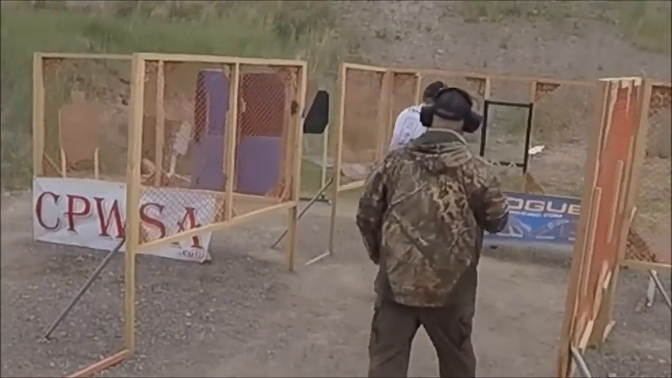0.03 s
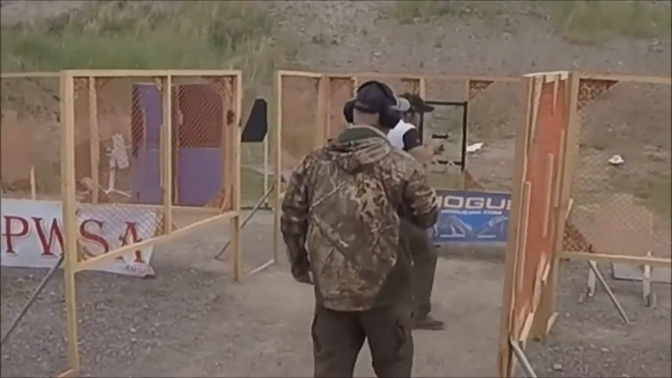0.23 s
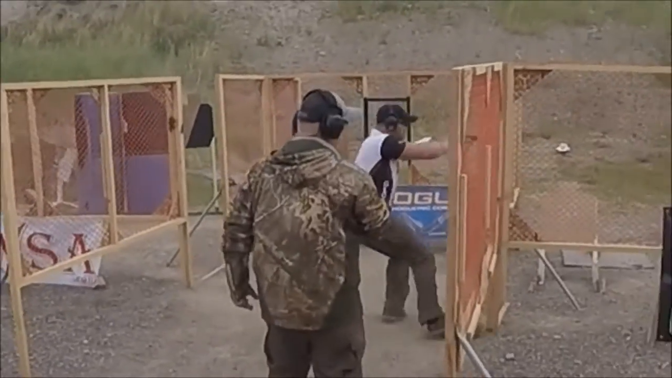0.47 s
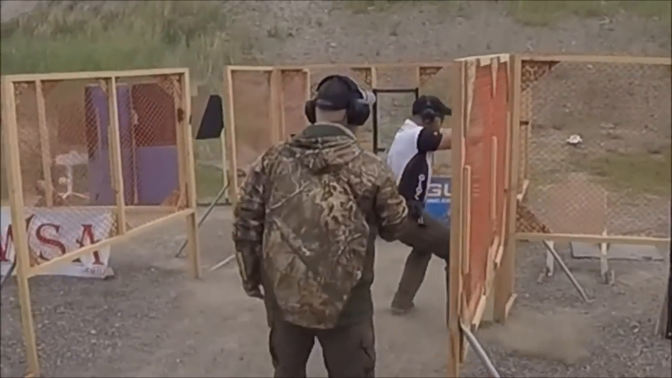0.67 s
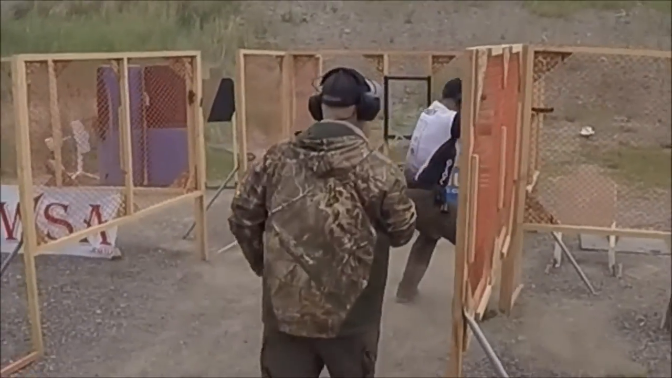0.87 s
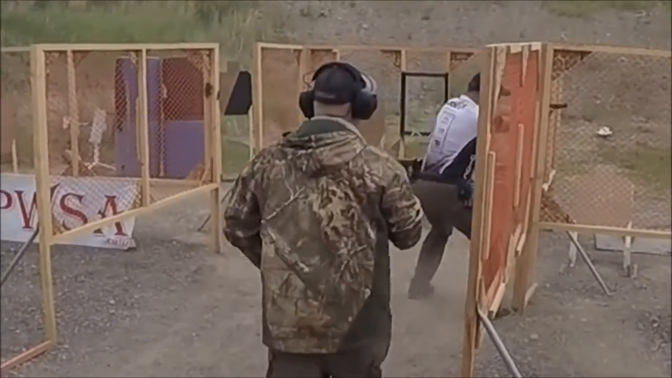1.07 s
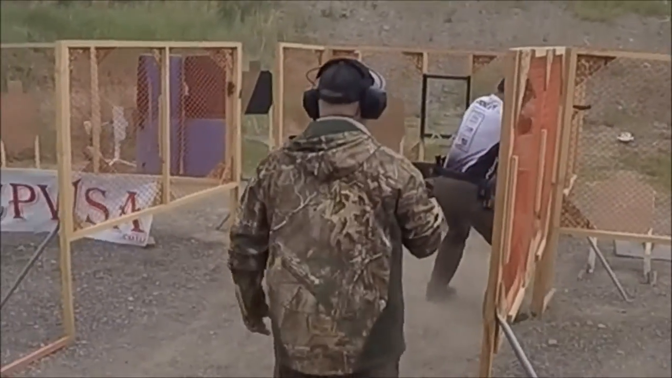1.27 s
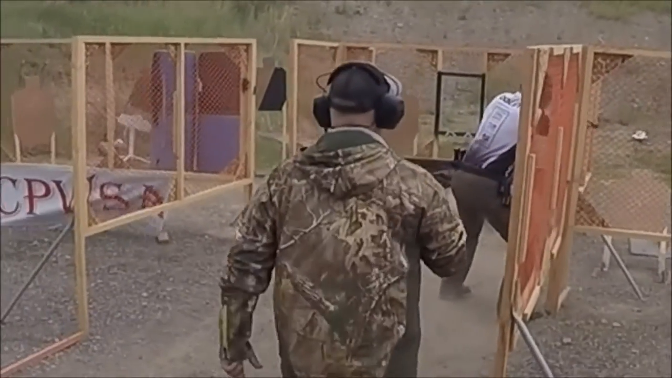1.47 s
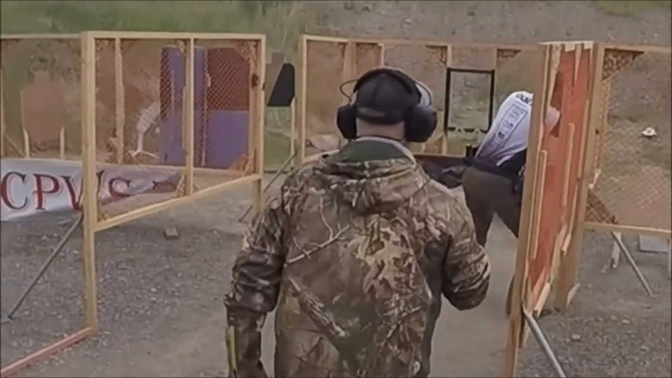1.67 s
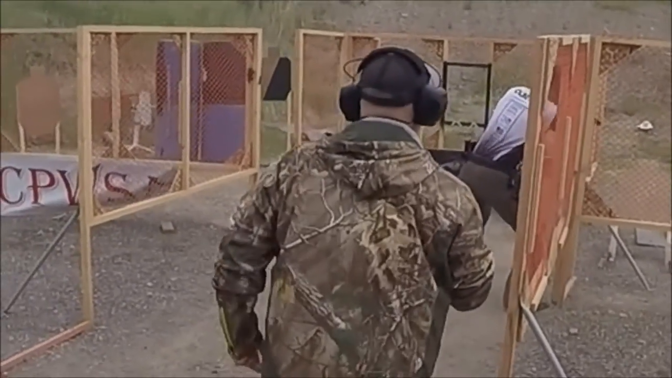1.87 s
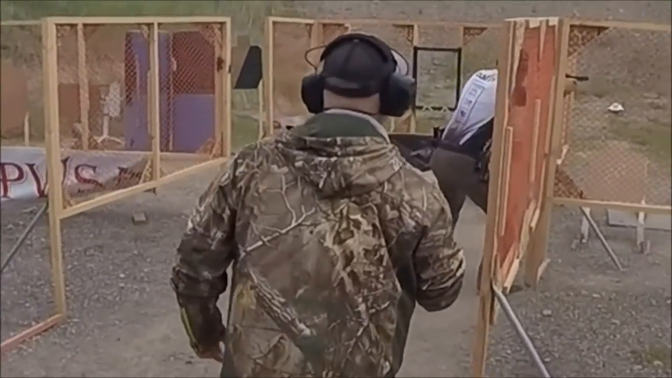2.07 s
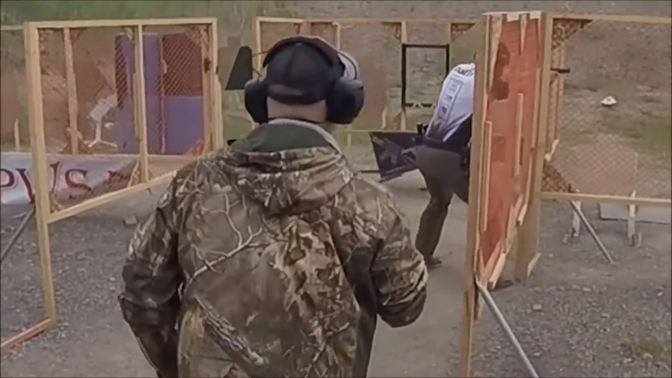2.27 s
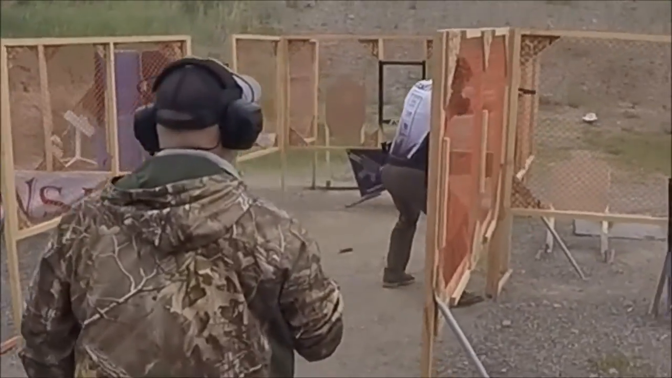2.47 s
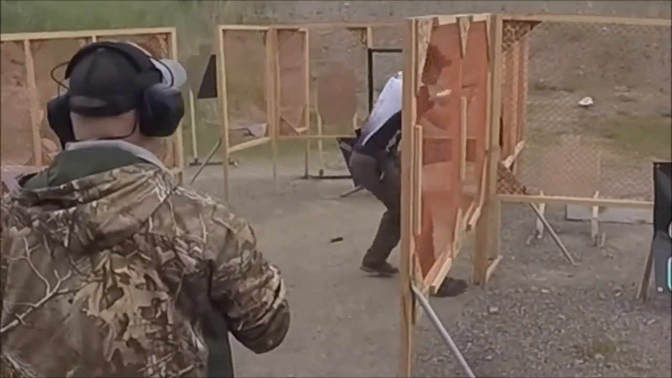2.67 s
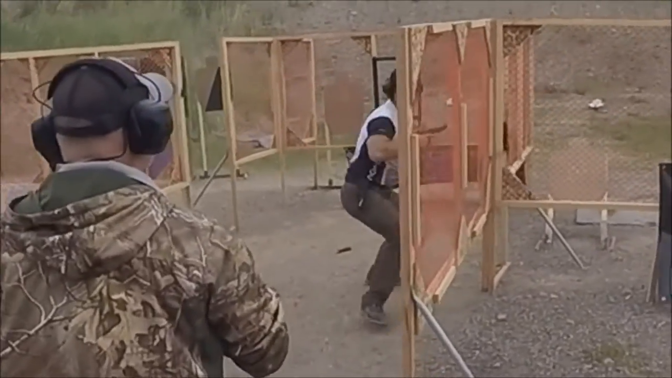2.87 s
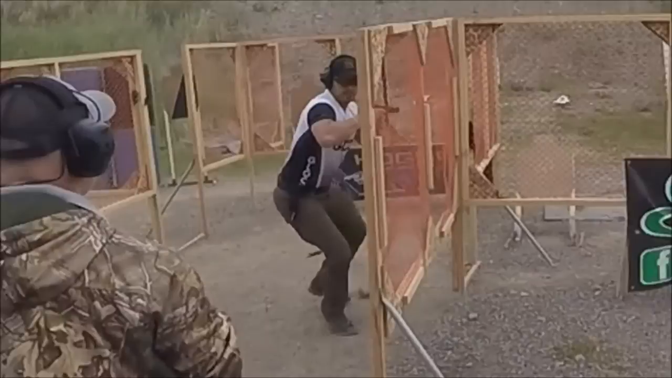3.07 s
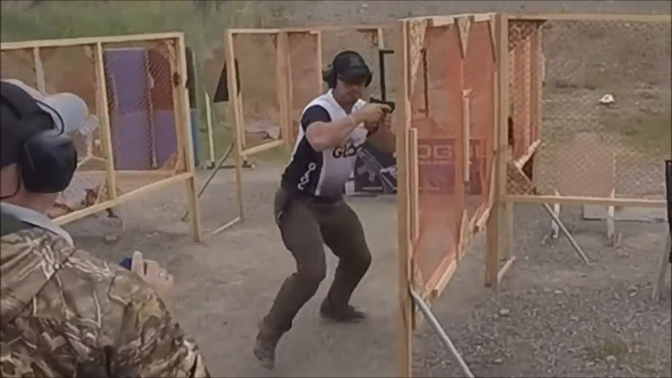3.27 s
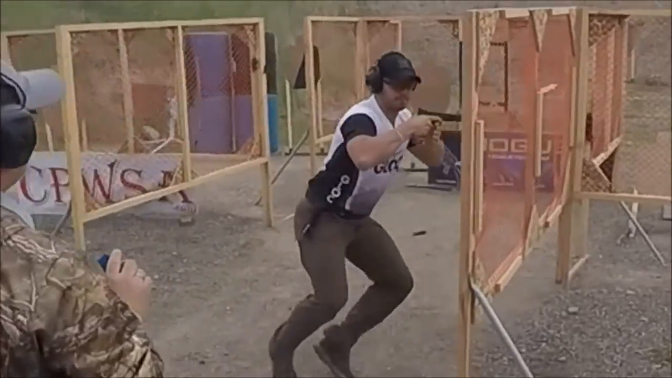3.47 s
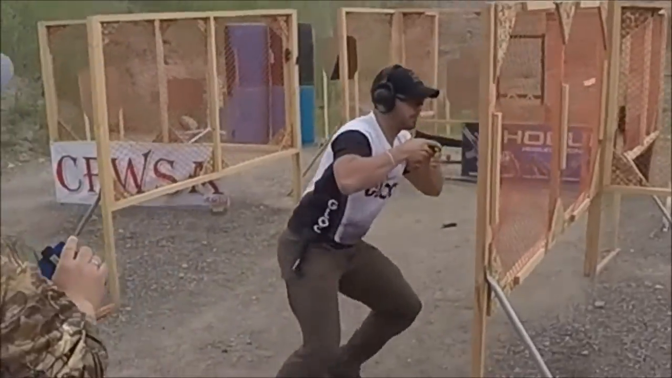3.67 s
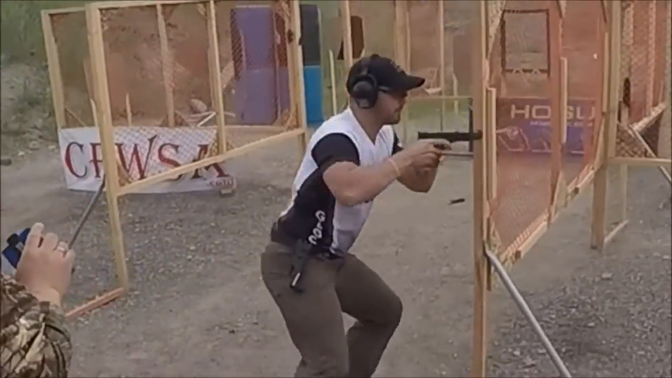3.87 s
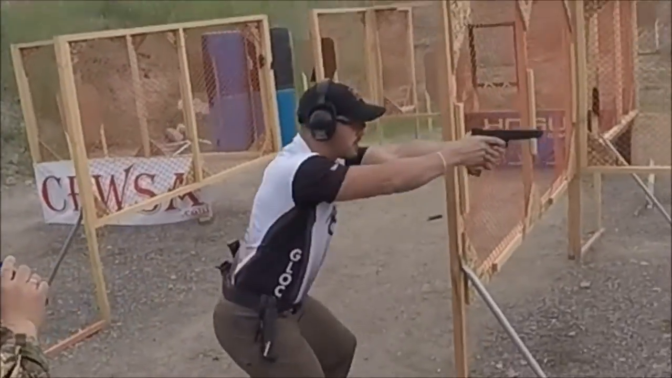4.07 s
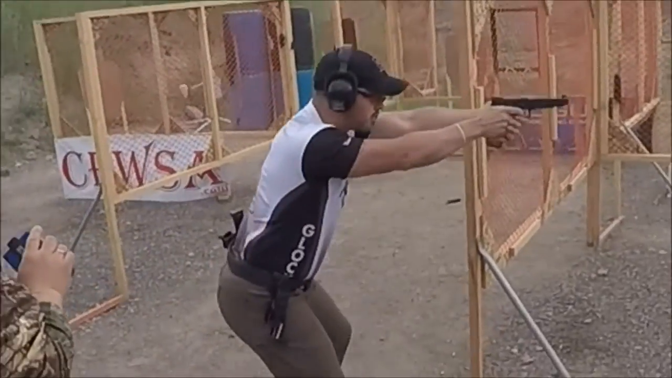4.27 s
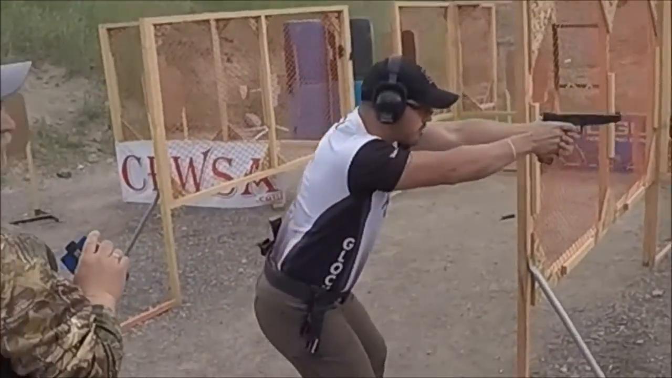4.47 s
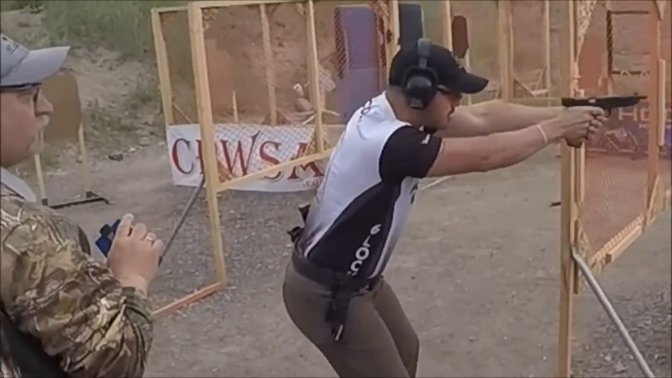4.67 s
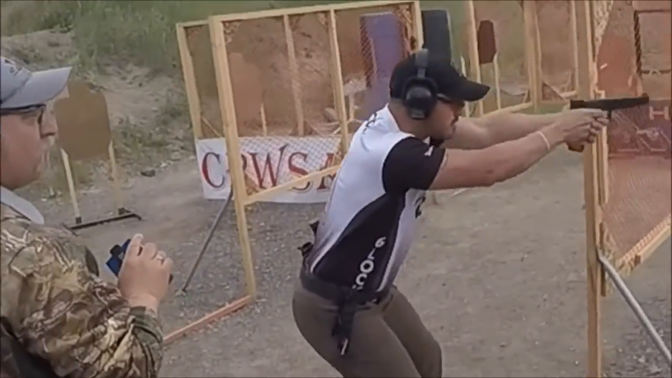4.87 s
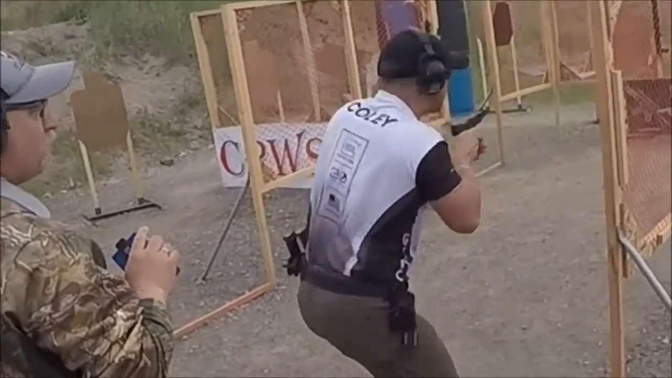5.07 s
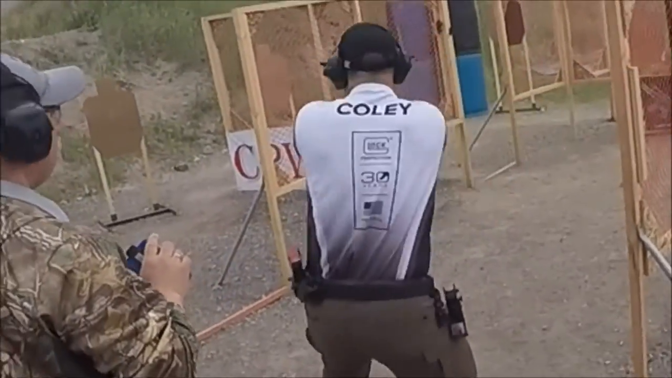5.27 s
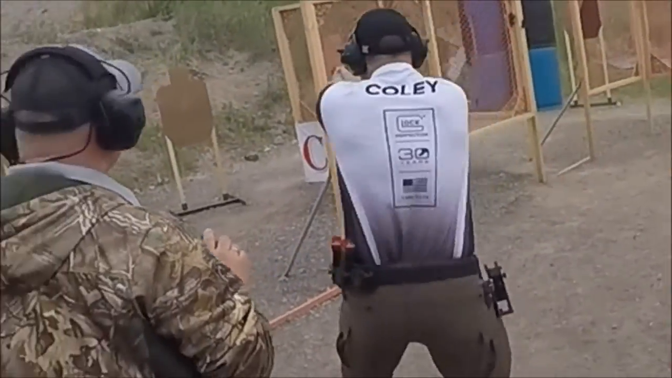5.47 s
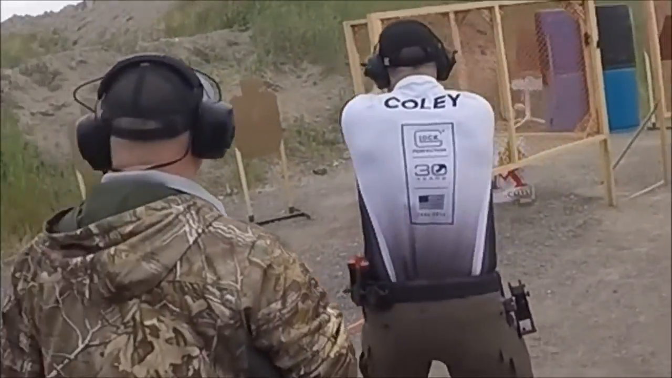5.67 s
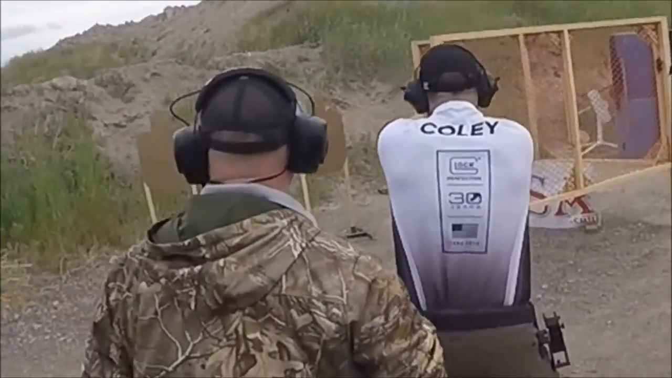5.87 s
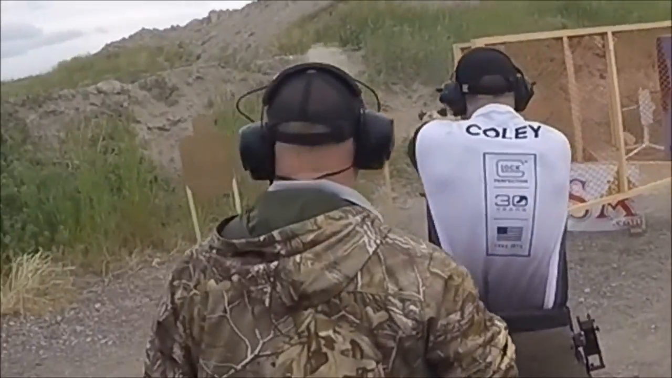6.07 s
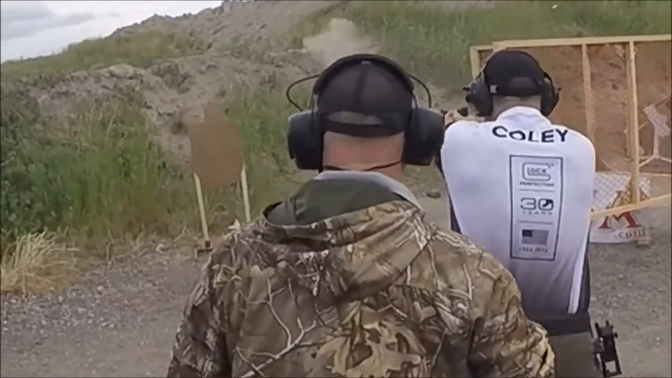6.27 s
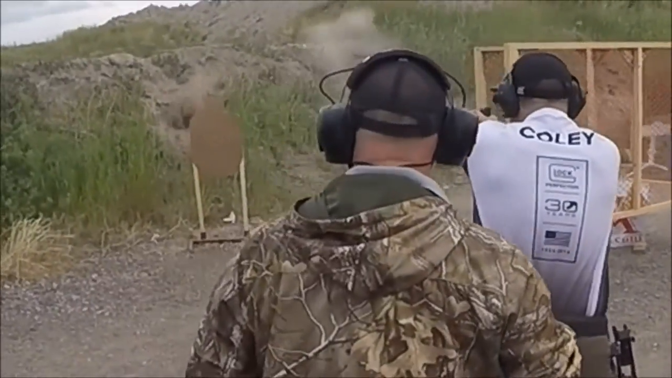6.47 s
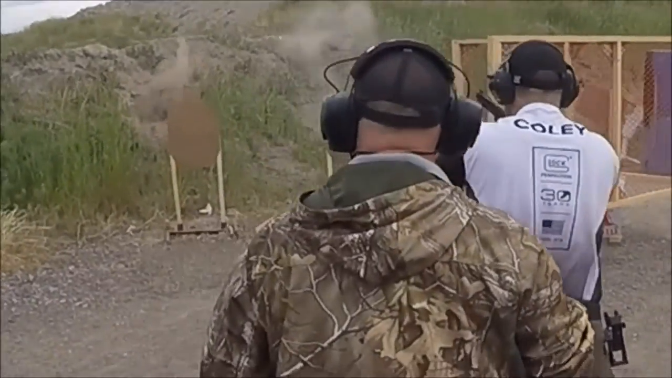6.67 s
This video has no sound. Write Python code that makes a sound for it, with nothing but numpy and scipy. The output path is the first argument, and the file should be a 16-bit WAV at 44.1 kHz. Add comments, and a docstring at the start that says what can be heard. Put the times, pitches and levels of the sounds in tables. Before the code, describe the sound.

Close pistol fire outdoors: seven echoing shots, a windy pause with gravel scuffs, then two quick strings of four.

```python
"""A gravel bay on an outdoor range, the microphone near a pistol competitor. Wind buffets it, boots
scuff the stones and spent cases tinkle. From 0.7 s come seven shots: each muzzle blast overloads the
microphone, bounces off ground and plywood walls and rolls away along the earth banks. In the lull
a faint whine falls far off, the boots move on and the strongest gust hits at about 4 s.
Two strings of four shots follow, at 4.3 s and 5.7 s, each with the echoes of a new position."""
import sys
import numpy as np
from scipy import signal
from scipy.fft import rfft, irfft
from scipy.io import wavfile

SR = 44100
rng = np.random.default_rng(int(sys.argv[2]) if len(sys.argv) > 2 else 0)


def store_wav(level_fs):
    """Save 16-bit WAV to argv[1]."""
    pcm = np.round(np.clip(np.atleast_2d(level_fs), -1, 1) * 32767)
    wavfile.write(sys.argv[1], SR, pcm.T.astype(np.int16))


N = 297230
TIME = np.arange(N) / SR
AGE = TIME[:SR]   # the second after an event


def from_db(db):
    return 10 ** (np.asarray(db) / 20)


def fade(t60):
    """Exponential decay, 60 dB down after t60 seconds."""
    return np.exp(-np.log(1000) * AGE / t60)


def swell(rise_s):
    """Smooth rise from nothing to one."""
    return 1 - np.exp(-(AGE / rise_s) ** 2)


def hiss():
    """One second of white noise."""
    return rng.standard_normal(SR)


def grains(spread_db):
    """One second of noise whose tiny impacts differ widely in size; rms 1."""
    x = hiss() * from_db(spread_db * np.clip(hiss(), -2.5, 2.5))
    return x / x.std()


def drift(rate_hz):
    """Slow random wander of spread 1."""
    step, settle = 40, 2000
    pole = np.exp(-2 * np.pi * step * rate_hz / SR)
    noise = rng.standard_normal(N // step + settle + 2)
    slow = signal.lfilter([1], [1, -2 * pole, pole * pole], noise)[settle:]
    return np.interp(np.arange(N) / step, np.arange(len(slow)), slow / slow.std())


def add(track, s, sound):
    """Mix a sound into a track at time s."""
    start = max(int(round(s * SR)), 0)
    track[start:start + len(sound)] += sound[:N - start]


def lowpass(x, hz):
    return signal.sosfilt(signal.butter(2, hz, fs=SR, output="sos"), x + 1e-18)


def colour(x, spectrum):
    """Causal (minimum-phase) filter with the given spectrum; white noise keeps its level."""
    size = 4096
    hz, db = np.transpose(spectrum)
    bin_hz = np.arange(size // 2 + 1) * SR / size
    gain = from_db(np.interp(np.log(bin_hz + 1), np.log(hz), db))
    cepstrum = irfft(np.log(gain))
    cepstrum[1:size // 2] *= 2
    cepstrum[size // 2 + 1:] = 0
    response = irfft(np.exp(rfft(cepstrum)))
    return signal.fftconvolve(x, response / np.linalg.norm(response))[:N]


def gust(rise_s, hold_s, fall_db_per_s):
    """Envelope of one gust: it builds, holds and dies away."""
    return np.minimum(TIME / rise_s, 1) * from_db(-fall_db_per_s * np.maximum(TIME - rise_s - hold_s, 0))


# Spectra of wind rumble, wind flutter and the open air of the bay: (frequency [Hz], relative level [dB])
RUMBLE_SPECTRUM = [(20, 4), (40, 3.5), (70, 1.5), (130, -6.5), (200, -16), (300, -22), (600, -67)]
FLUTTER_SPECTRUM = [(94, -19.5), (160, 0), (332, -6.5), (371, -5), (530, -8.5), (912, -9.5), (1480, -33),
                    (2040, -32), (7690, -60), (8940, -77.5), (11800, -72), (14000, -68.5)]
AIR_SPECTRUM = [(30, 5), (100, -13.5), (200, -20.5), (450, -30), (850, -14.5), (1100, -18), (1400, -30.5),
                (2400, -36.5), (3500, -44), (5000, -41.5), (8000, -48), (15000, -58)]
# Gusts on the microphone: (time [s], rise [s], hold [s], rumble level [dB], flutter level [dB])
GUSTS = [(0, 0.0077, 0.56, -29.5, -48), (0.417, 0.082, 0.095, -26, -40.5), (2.032, 0.086, 0.78, -31, -51.5),
         (2.249, .08, 0.22, -28, -43.5), (2.945, 0.088, 0.66, -42, -55), (3.584, 0.11, .15, -25, -40),
         (3.778, 0.05, 0.19, -17, -26), (3.969, 0.17, .11, -11.5, -16), (4.967, 0.088, 0.14, -41, -57),
         (5.193, 0.076, 0.37, -31, -44), (6.038, 0.037, 0.082, -44, -72)]


def wind():
    """Gusts rumble on the microphone port; strong ones break into flutter. Faint open air lies below."""
    rumble_power = np.full(N, from_db(-59) ** 2)   # the breeze between gusts
    flutter_power = np.full(N, from_db(-73.5) ** 2)
    for s, rise_s, hold_s, rumble_db, flutter_db in GUSTS:
        add(rumble_power, s, (from_db(rumble_db) * gust(rise_s, hold_s, fall_db_per_s=47)) ** 2)
        add(flutter_power, s, (from_db(flutter_db) * gust(rise_s, hold_s, fall_db_per_s=171.5)) ** 2)
    lumps, eddies = from_db(2.0 * drift(12)), from_db(2.2 * drift(35))
    rumble = colour(rng.standard_normal(N), RUMBLE_SPECTRUM) * np.sqrt(rumble_power) * lumps
    flutter = colour(rng.standard_normal(N), FLUTTER_SPECTRUM) * np.sqrt(flutter_power) * eddies
    air = from_db(-49) * colour(rng.standard_normal(N), AIR_SPECTRUM)
    return rumble + flutter + air


# Boots on the gravel floor: (time [s], length [s], level [dB], band centre [Hz])
BOOT_SCUFFS = [(0.005, 0.027, -43.5, 3070), (0.17, 0.033, -41, 4900), (0.194, 0.031, -43, 6640),
               (0.308, 0.17, -55.5, 2420), (0.377, 0.036, -49.5, 6040), (0.401, 0.081, -50, 1930),
               (0.467, 0.055, -41, 1398), (0.54, 0.083, -47, 1400), (0.607, 0.15, -56.5, 7000),
               (1.625, 0.062, -65, 2520), (2.291, 0.05, -52, 2170), (3.272, 0.038, -55.5, 2500),
               (3.402, 0.06, -56.5, 2000), (3.51, 0.076, -58.5, 2950), (3.573, 0.05, -53.5, 2450),
               (3.683, 0.15, -49.5, 2320)]
# Sharp ticks of stones and gear: (time [s], level [dB])
STONE_TICKS = [(1.312, -38.5), (1.348, -38.5), (3.24, -52), (3.292, -54), (4.175, -26.5), (4.994, -34),
               (5.112, -35), (5.646, -45.5), (6.63, -39)]


def gravel():
    """Soles grind small stones, dull when sliding and bright when landing; single stones and gear tick."""
    scuffs, ticks = np.zeros(N), np.zeros(N)
    for s, length_s, db, hz in BOOT_SCUFFS:
        band = signal.butter(1, [hz / 1.6, hz * 1.3], "band", fs=SR, output="sos")
        grit = signal.sosfilt(band, grains(spread_db=9.5))
        envelope = swell(length_s / 5) * np.exp(-(AGE / length_s) ** 0.89)
        add(scuffs, s, from_db(db) * grit / grit.std() * envelope)
    sole = signal.lfilter(*signal.iirpeak(900, 2, fs=SR), scuffs)   # the hollow body of the boot
    for s, db in STONE_TICKS:
        add(ticks, s, from_db(db) * hiss() * fade(0.011))
    crunch = from_db(2.5 * drift(90))
    return lowpass((scuffs + from_db(2) * sole) * crunch + ticks, hz=7000)


# Spent brass landing on the stones: (time [s], pitch [Hz], level [dB])
CASE_LANDINGS = [(0.526, 7100, -59), (0.588, 11100, -55), (0.656, 11550, -62), (3.065, 8050, -71),
                 (3.635, 9100, -69), (3.865, 13800, -60), (3.97, 7600, -66.5), (3.975, 13800, -58),
                 (3.975, 11550, -62), (4.129, 11800, -49.5), (4.195, 11800, -59), (5.46, 7500, -70.5),
                 (5.648, 7520, -72.5)]


def spent_cases():
    """Each brass case rings in the close pair of modes that the stone excites."""
    out = np.zeros(N)
    for s, hz, db in CASE_LANDINGS:
        twin_hz = hz + rng.uniform(30, 110)
        ring = np.sin(2 * np.pi * hz * AGE) + .6 * np.sin(2 * np.pi * twin_hz * AGE)
        add(out, s, from_db(db) * ring * fade(.26))
    return out


# Where the shooter stands and leans in the bay: (start time [s], ground bounce lag [ms],
# far wall lag [ms], far wall [dB], target slap [dB], scatter [dB], bank roll [dB], thump [dB])
STANCES = [(0, 2.14, 31.6, 4.5, -32.5, -12, -34, -16), (1.5, 1.38, 52, -1.5, -51, -7, -27.5, -23.5),
           (2.2, 2.14, 38, 4.5, -28.5, -7.5, -28, -23.5), (3.5, 4.05, 42, -2.5, -55, -14.5, -39, -21.5),
           (5.3, 3.67, 56, 0.5, -42, -8.5, -30.5, -30.5)]
ECHO_FOLLOWS = 0.54   # share of a shot's strength in dB that reaches the far wall and the scatter


def stance(s):
    """The echo paths from the place where the shooter stands at time s."""
    row = [row for row in STANCES if row[0] <= s][-1]
    columns = ("ground_ms", "far_ms", "far_db", "slap_db", "scatter_db", "roll_db", "thump_db")
    return dict(zip(columns, row[1:]))


def muzzle_pulse(gas_db, gas_t60):
    """A rounded shock front, then a few milliseconds of turbulent gas that carries the crack."""
    front = lowpass(1. * (AGE == 0), hz=2600)
    return front + from_db(gas_db) * hiss() * fade(gas_t60)


def disperse(x, hz, width_hz):
    """All-pass: sound near hz lingers, so the crack arrives ahead of the boom."""
    radius = np.exp(-np.pi * width_hz / SR)
    feedback = [1, -2 * radius * np.cos(2 * np.pi * hz / SR), radius * radius]
    return signal.lfilter(feedback[::-1], feedback, x + 1e-18)


# Pistol shots; the nearer plywood wall answers differently with each aim:
# (time [s], strength [dB], wall echo lag [ms], wall echo level [dB])
SHOTS = [(0.7120, 9, 23.6, 15.5), (0.8844, 0.5, 23, -9), (1.1293, -5, 27, 7.5), (1.6976, 0.5, 22, 12.5),
         (1.8710, -3, 20.4, 10.5), (2.3913, 0.5, 23.8, 12.5), (2.6120, -0.5, 22.4, 14),
         (4.3139, 13.5, 18.4, 20.5), (4.5056, 4, 21, 11.5), (4.74, -1, 20, 4.5), (4.9267, -2, 21, 6),
         (5.7282, 1.5, 35.4, 15.5), (5.9479, -1.5, 32.5, 12.5), (6.2339, -1.5, 33.6, 11.5),
         (6.4492, -2.5, 34.2, 13.5)]
# Spectrum of the blast at close range: (frequency [Hz], relative level [dB])
BLAST_SPECTRUM = [(80, -13), (200, -3), (450, -1), (720, 3), (920, 2), (1250, -7), (2300, -10), (3500, -12),
                  (5100, -16), (5800, -21), (6600, -18), (7800, -27), (10000, -31), (15000, -48)]


def muzzle_blasts():
    """Each blast reaches the microphone directly, then 3 dB down and duller off the ground."""
    out = np.zeros(N)
    blast_db, treble_kept = 21.5, 0.51
    for s, db, *_ in SHOTS:
        pulse = muzzle_pulse(gas_db=-18, gas_t60=.009)
        bounce = treble_kept * pulse + (1 - treble_kept) * lowpass(pulse, hz=1000)
        add(out, s, from_db(blast_db + db) * pulse)
        add(out, s + stance(s)["ground_ms"] / 1000, from_db(blast_db + db - 3) * bounce)
    return colour(disperse(out, hz=500, width_hz=1200), BLAST_SPECTRUM)


# Resonances of the microphone housing: (frequency [Hz], width [Hz], gain [dB])
HOUSING_MODES = [(1505, 110, 4.5), (2320, 140, -1), (3380, 440, -3.5), (5090, 990, 7), (6700, 690, 5.5),
                 (8700, 340, 3)]


def housing(x):
    """The cavity in front of the microphone adds narrow peaks and dips."""
    for hz, width_hz, db in HOUSING_MODES:
        band = signal.lfilter(*signal.iirpeak(hz, hz / width_hz, fs=SR), x)
        x = x + (from_db(db) - 1) * band
    return x


# Spectrum of the echoes off nearby props: (frequency [Hz], relative level [dB])
SCATTER_SPECTRUM = [(47, -33), (80, -11.5), (250, -6.5), (379, -16), (526, -9.5), (833, -3), (971, -3.5),
                    (1080, -11), (1570, -19), (2280, -12), (3380, -21), (5130, -25.5), (5720, -32),
                    (7280, -32.5), (15000, -37.5)]


def prop_scatter():
    """Posts, barrels and people throw back a dense cloud of echoes that changes as the shooter moves."""
    out, pattern, last_s = np.zeros(N), grains(spread_db=4), 0
    for s, db, *_ in SHOTS:
        kept = np.exp(-(s - last_s) / 0.76)   # shots in quick succession share much of their pattern
        pattern = kept * pattern + np.sqrt(1 - kept ** 2) * grains(spread_db=3)
        last_s = s
        gain = from_db(stance(s)["scatter_db"] + ECHO_FOLLOWS * db)
        add(out, s, gain * pattern * swell(0.0024) * fade(0.17))
    return colour(out, SCATTER_SPECTRUM)


# Spectrum of the roll along the banks around the bay: (frequency [Hz], relative level [dB])
ROLL_SPECTRUM = [(47, -43), (80, -2), (109, -2.5), (332, -3.5), (503, -4.5), (587, -3.5), (815, -1.5),
                 (1260, -16.5), (2230, -11), (3380, -19), (5020, -21), (5980, -31.5), (7440, -26.5),
                 (14000, -39.5), (15000, -56)]


def bank_roll():
    """The report rolls away, dulled, along the earth banks; the far bank returns one more soft swell."""
    low, high = np.zeros(N), np.zeros(N)
    far_bank_lag_s = .175
    for s, *_ in SHOTS:
        roll_db = stance(s)["roll_db"]
        roll = from_db(roll_db) * grains(spread_db=3.5) * swell(0.026)
        far_bank = from_db(roll_db - 6) * grains(spread_db=3.5) * swell(0.0089) * fade(0.1)
        for track, t60 in (low, 0.65), (high, 0.66):
            add(track, s, roll * fade(t60))
            add(track, s + far_bank_lag_s, far_bank)
    uneven = from_db(2.2 * drift(55))
    return colour(high + lowpass(low - high, hz=3500), ROLL_SPECTRUM) * uneven


def gas_thumps():
    """The expanding gas gives the microphone a short punch, then one slow push and pull."""
    out = np.zeros(N)
    for s, db, *_ in SHOTS:
        thump_db = stance(s)["thump_db"] + db
        punch = lowpass(hiss(), hz=378)
        add(out, s + 0.0014, from_db(thump_db + 5) * punch / punch.std() * fade(0.1))
        add(out, s + .003, from_db(thump_db + 3) * np.sin(2 * np.pi * 45 * AGE) * fade(.075))
    return out


# Spectrum of the echo off plywood: (frequency [Hz], relative level [dB])
PLYWOOD_SPECTRUM = [(100, -18), (250, -7), (450, -1), (720, 3), (920, 0), (1300, -12), (2300, -16),
                    (3500, -25), (5000, -24), (8000, -37), (15000, -52)]


def wall_echoes():
    """Two plywood walls, one nearer and one farther off, return mostly the boom of each blast."""
    out = np.zeros(N)
    for s, db, near_ms, near_db in SHOTS:
        here = stance(s)
        far_db = here["far_db"] + ECHO_FOLLOWS * db
        add(out, s + near_ms / 1000, from_db(near_db) * muzzle_pulse(gas_db=-21.5, gas_t60=.02))
        add(out, s + here["far_ms"] / 1000, from_db(far_db) * muzzle_pulse(gas_db=-22, gas_t60=.02))
    return colour(disperse(out, hz=700, width_hz=700), PLYWOOD_SPECTRUM)


# Spectrum of the echoes from down range: (frequency [Hz], relative level [dB])
SLAP_SPECTRUM = [(200, -6), (800, 8), (1400, 3.5), (2400, 2), (3500, -12), (5200, -6.5),
                 (8000, -21.5), (15000, -30)]


def target_slaps():
    """Targets and frames down range return thin separate echoes: one at a steady lag, eight scattered."""
    out = np.zeros(N)
    steady_lag_s, count, fall_db_per_s = .091, 8, 45
    for s, *_ in SHOTS:
        here = stance(s)
        add(out, s + steady_lag_s, from_db(here["slap_db"]) * hiss() * fade(.03))
        for lag_s, db in zip(rng.uniform(.06, .27, count), rng.normal(-7, 3, count)):
            gain = from_db(here["roll_db"] + db - fall_db_per_s * lag_s)
            add(out, s + lag_s, gain * hiss() * fade(.035))
    return colour(out, SLAP_SPECTRUM)


def distant_whine():
    """A faint falling whine, as of a tumbling ricochet far off."""
    out = np.zeros(N)
    hz = 540 * np.exp(-1.7 * AGE)
    tone = np.sin(2 * np.pi * np.cumsum(hz) / SR)
    envelope = swell(0.036) * np.exp(-(AGE / 0.094) ** 4)
    add(out, 3.05, from_db(-52.5) * tone * envelope)
    return out


def scene():
    """The bay from one mono microphone, whose housing colours the blasts and their echoes."""
    reports = muzzle_blasts() + wall_echoes() + prop_scatter() + target_slaps() + bank_roll()
    gunfire = housing(reports) + gas_thumps()
    return (gunfire + wind() + gravel() + spent_cases() + distant_whine())[None]


def record(dry):
    """The microphone saturates on every blast; the treble is softened and the very top cut."""
    ceiling, cutoff_hz = .95, 15000
    squashed = dry / (1 + (dry / ceiling) ** 4) ** .25
    dulled = signal.lfilter([.5], [1, -.5], squashed, axis=-1)
    softened = squashed + 0.87 * (dulled - squashed)
    return signal.sosfilt(signal.ellip(8, .1, 80, cutoff_hz, fs=SR, output="sos"), softened)


dry = scene()
out = record(dry)
store_wav(out)
```